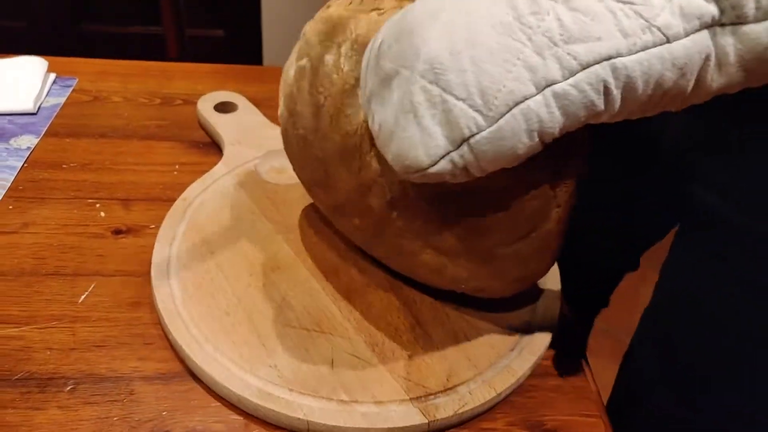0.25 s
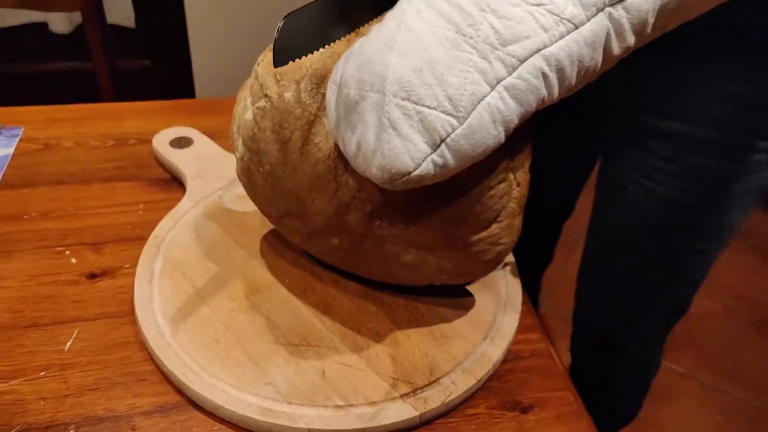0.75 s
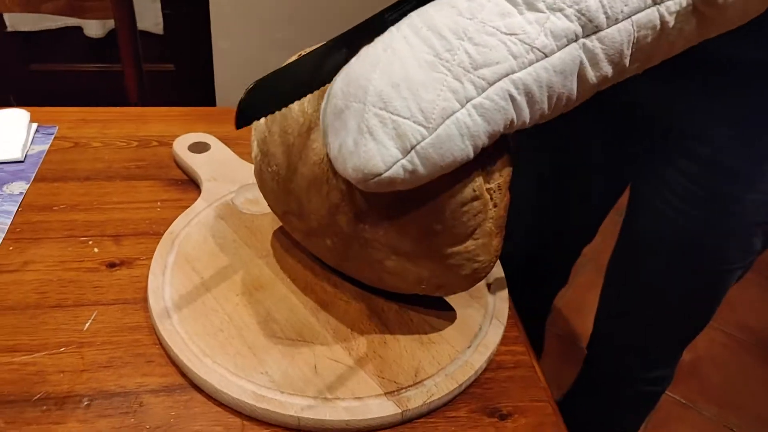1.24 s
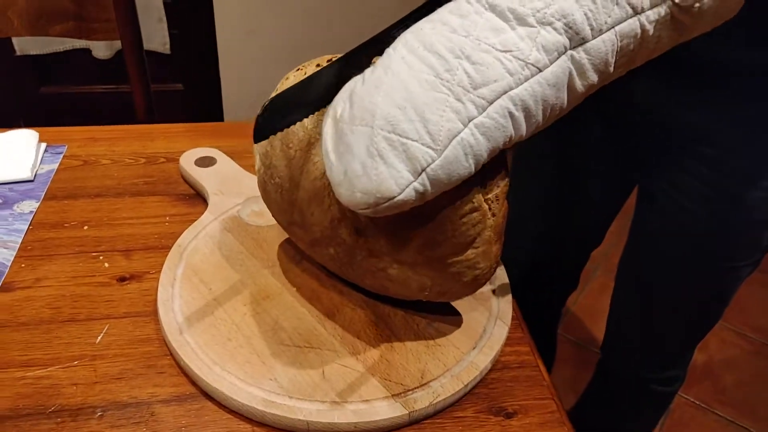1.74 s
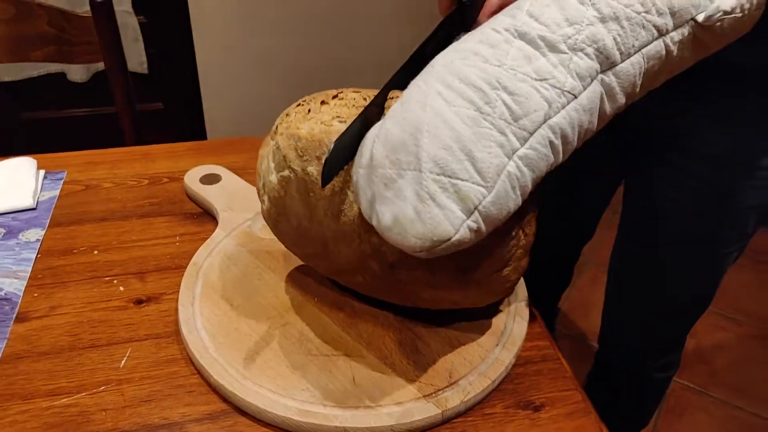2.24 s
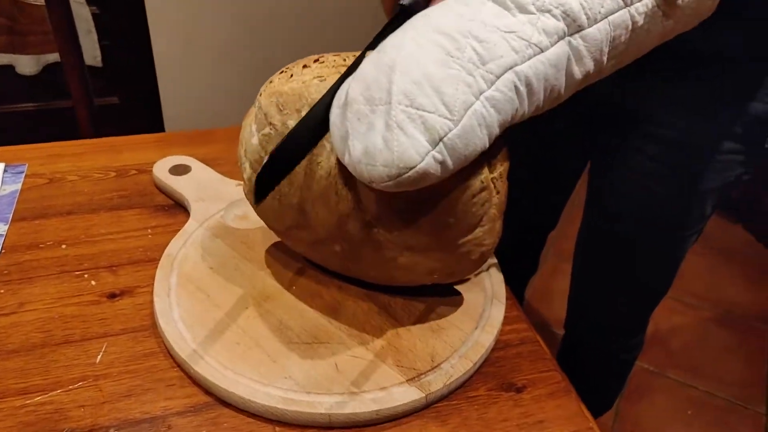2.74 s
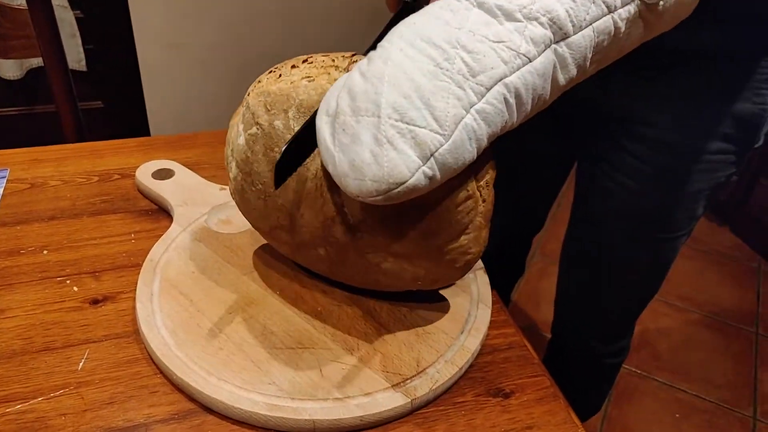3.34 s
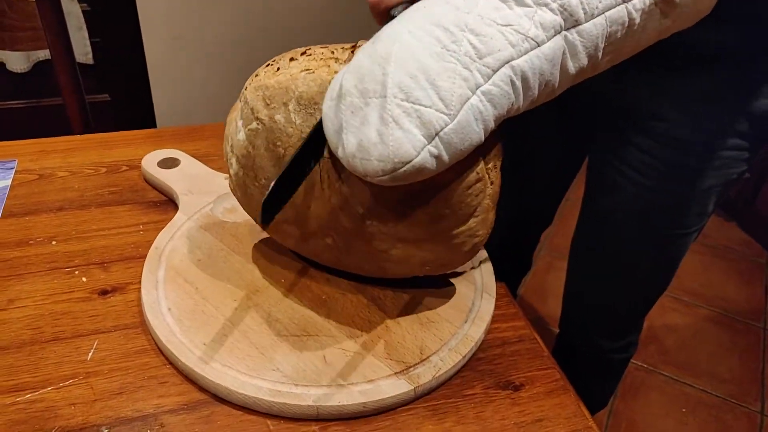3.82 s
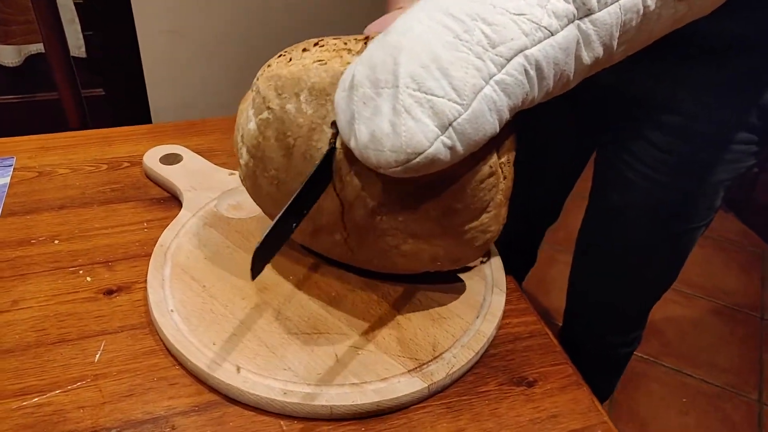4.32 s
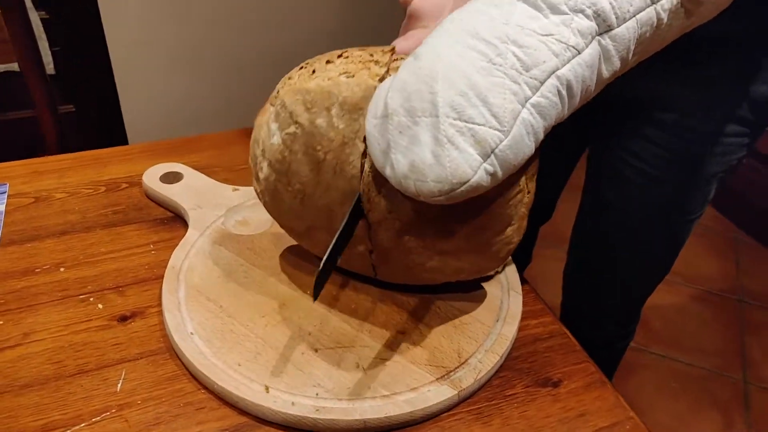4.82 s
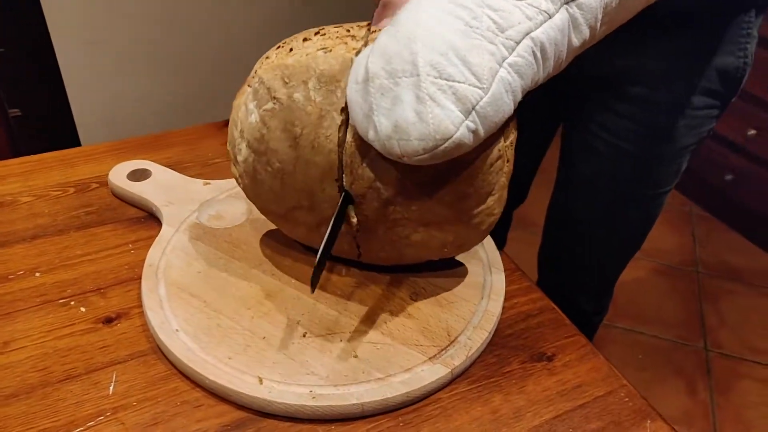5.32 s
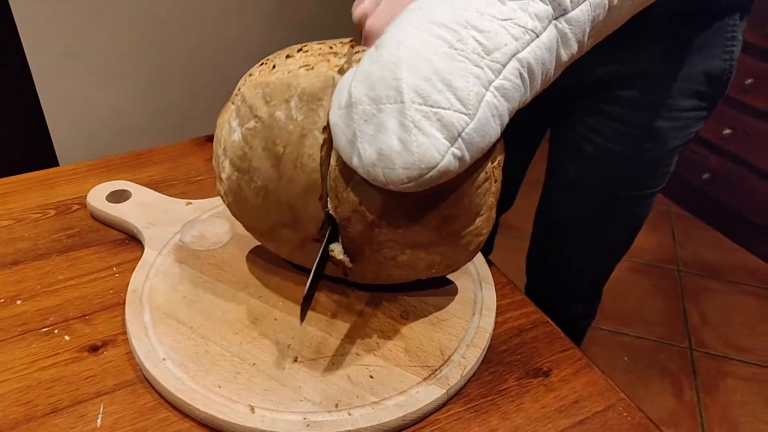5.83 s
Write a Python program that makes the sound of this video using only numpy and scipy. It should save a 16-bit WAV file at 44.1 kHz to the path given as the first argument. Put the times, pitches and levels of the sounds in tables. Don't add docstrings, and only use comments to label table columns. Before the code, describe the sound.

In a small, quiet kitchen with a faint low hum, a phone picks up the scene closely in stereo. From 0 to 0.7 seconds a loaf is handled and set on a wooden board: a faint touch, then low soft thuds around 0.2, 0.35 and 0.6. At about 0.8 a serrated knife starts sawing lightly, and by 1.2 it bites with a crunchy rasp. Strokes alternate roughly every 0.2 seconds, teeth catching in a rapid rough stutter, with brief gaps at the turns. Strong strokes at 1.6 and 2.3 thump the board; 2.5 to 3.3 is somewhat lighter. From 3.5 to 5.3 the cutting is fullest, with hollow crust knocks, dense crackle and hard bright snaps, the heaviest jolt near 5.15. A softer stroke follows at 5.35, another strong crunch with a big crack around 5.6 to 5.7, then a lighter stroke and final bump near 6.06.

```python
import sys
import numpy as np
from scipy import signal
from scipy.fft import rfft, irfft, next_fast_len
from scipy.io import wavfile
from scipy.ndimage import uniform_filter1d

SR = 44100
rng = np.random.default_rng(int(sys.argv[2]) if len(sys.argv) > 2 else 0)


def boost(x):
    u = np.asarray(x, float) / 20
    return 10 ** u


def unload_wav(signal):
    wavfile.write(
        sys.argv[1],
        SR,
        np.round(np.clip(np.atleast_2d(signal).T, -1, 1) * 32767).astype(np.int16),
    )


N = 267687


def evened(x):
    return x / np.sqrt(np.mean(x ** 2) + 1e-20)


def unit(h):
    return h / np.linalg.norm(h, axis=-1, keepdims=True)


def read(points, hz):
    f, value = np.transpose(points)
    return np.interp(np.log(hz + 1), np.log(f + 1), value)


def along(curve):
    return np.interp(np.arange(N) / SR, *np.transpose(curve))


def causal(points, size=4096):
    level_db = np.maximum(read(points, abs(np.fft.fftfreq(size, 1 / SR))), -80)
    spectrum = np.exp(np.conj(signal.hilbert(np.log(boost(level_db)))))
    return unit(np.fft.ifft(spectrum).real[:size // 2])


def ringing(modes):
    t = np.arange(SR // 2) / SR
    return unit(sum(boost(db - 60 * t / t60) * np.sin(2 * np.pi * hz * t) for hz, db, t60 in modes))


def resonate(x, hz, width):
    turn = np.exp(2j * np.pi * np.cumsum(hz) / SR)
    r = np.exp(-np.pi * width / SR)
    return 2 * (turn * signal.lfilter([1 - r], [1, -r], x / turn)).real


def slips(per_s, spread_db):
    chance, size, sign = rng.random((N, 3)).T
    strength = boost(spread_db * np.minimum(-np.log(size + 1e-9), 4))
    return (chance < per_s / SR) * strength * np.sign(sign - 0.5)


def blows(rows, column):
    rows, out = np.array(rows), np.zeros(N)
    out[np.minimum((rows[:, 0] * SR).astype(int), N - 1)] = boost(rows[:, column])
    return out


def clumps(depth_db, length_s):
    size = round(length_s * SR)
    wander = uniform_filter1d(uniform_filter1d(rng.standard_normal(N), size), size)
    return boost(depth_db * evened(wander))


def bursts(drive, burst_s, patchy_db, count=10):
    t, spot, out = np.arange(1024) / SR, rng.integers(0, count, N), np.zeros((2, N))
    hz = np.linspace(1500, 16000, num=9)
    for k in range(count):
        noise = rng.standard_normal((2, len(t))) + 0.5 * rng.standard_normal(len(t))
        burst = noise * np.exp(-t / burst_s)
        colour = causal(np.transpose([hz, patchy_db * rng.standard_normal(len(hz))]), size=512)
        burst = unit(signal.oaconvolve(burst, colour[None], axes=1))
        out += signal.oaconvolve((drive * (spot == k))[None], burst, axes=1)[:, :N]
    return out


def effort(rows, column, shape, bite):
    rows, t = np.array(rows), np.arange(0, N, 32) / SR
    rise, fall, level_db = shape
    swell, grip_s = bite
    start, hold = rows[:, :1], rows[:, 1:2]
    early, late = start - t, t - start - hold
    db = rows[:, column, None] + level_db
    db = db - swell * rise * np.maximum(early, 0) - fall * np.maximum(late, 0)
    db -= 2500 * np.maximum(early - grip_s, 0)
    return np.interp(np.arange(N) / SR, t, np.sqrt((boost(db) ** 2).sum(0)))


# (f/Hz, level/dB)
HUM_COLOUR = [(24, -14), (45, 5), (110, 6), (320, 2.5), (444, -5.5), (2570, -19), (3560, -21.5),
              (4130, -20.5), (6820, -21.5), (8500, -31), (12000, -32), (15500, -31)]


def hum():
    hz = np.fft.rfftfreq(N, 1 / SR)
    left, other = rfft(rng.standard_normal((2, N)))
    same = 0.9 / (1 + (hz / 500) ** 2)
    right = same * left + np.sqrt(1 - same ** 2) * other
    return boost(-45.5) * evened(irfft(np.array([left, right]) * boost(read(HUM_COLOUR, hz)), N))


# (rise/dB per s, fall/dB per s, level/dB)
PUSH_SHAPE, KNOCK_SHAPE = (446, 250, 2.04), (520, 326, 2.1)
CRACKLE_SHAPE, SHAKE_SHAPE = (500, 187, 4.22), (230, 140, -3)
# (start t/s, hold t/s, push level/dB, knock level/dB, crackle level/dB)
SETTLING = [
    (0.048, 0.013, -45, -46, -65),
    (0.21, 0.064, -31, -54, -56.5),
    (0.354, 0.0066, -33.5, -61, -68),
    (0.39, 0.029, -29, -46, -59),
    (0.619, 0.01, -36.5, -52, -55),
    (0.68, 0.15, -56, -51.5, -53.5),
]
# (start t/s, hold t/s, push level/dB, knock level/dB, crackle level/dB)
AWAY = [(0.795, 0.062, -32, -47, -53.5), (1.1, 0.037, -25, -36, -41.5), (1.382, 0.074, -25.5, -38.5, -43.5),
        (1.731, 0.056, -24, -34.5, -44), (2.095, 0.039, -21.5, -26, -36), (2.537, 0.055, -30, -28.5, -41),
        (2.928, 0.048, -27, -27, -38), (3.318, 0.033, -26.5, -28, -38.5), (3.72, 0.035, -24, -27.5, -42.5),
        (4.081, 0.024, -21.5, -22.5, -39), (4.445, 0.087, -20.5, -30.5, -42),
        (4.884, 0.066, -21, -26.5, -39.5), (5.352, 0.1, -27.5, -41, -47.5), (5.839, 0.1, -26.5, -36, -45.5)]
# (start t/s, hold t/s, push level/dB, knock level/dB, crackle level/dB)
BACK = [(0.931, 0.049, -30, -52, -46.5), (1.21, 0.07, -20.5, -30, -38), (1.562, 0.052, -15.5, -25, -37.5),
        (1.906, 0.034, -23.5, -35.5, -42.5), (2.324, 0.076, -17.5, -24, -37.5),
        (2.743, 0.057, -25.5, -28.5, -40.5), (3.09, 0.088, -25, -30.5, -44),
        (3.499, 0.043, -16, -21.5, -39), (3.896, 0.049, -17, -22, -38), (4.283, 0.073, -19, -24, -33),
        (4.665, 0.097, -17.5, -24.5, -33), (5.117, 0.1, -17.5, -27, -36.5), (5.598, 0.13, -21.5, -30, -35),
        (6.071, 0.0041, -27, -36, -52)]
# (start t/s, hold t/s, push level/dB, knock level/dB, crackle level/dB)
RESTING = [
    (0.9, 5.2, -41, -46.5, -60.5),
    (2.274, 0.034, -52, -56, -45.5),
    (0.03, 0.19, -60, -64, -61),
    (0.64, 0.28, -55, -58, -65),
    (3.48, 0.02, -27, -32, -45),
    (4.64, 0.018, -25, -36, -48),
    (5.08, 0.016, -30, -40, -48),
]


def strokes(column, shape):
    settling = effort(SETTLING, column, shape, bite=(1.1, 0.017))
    away = effort(AWAY, column, shape, bite=(0.81, 0.027))
    back = effort(BACK + RESTING, column, shape, bite=(1, 0.05))
    return np.sqrt(settling ** 2 + away ** 2 + back ** 2)


# (t/s, pace/per s)
PACE = [(0.22, 93), (0.36, 176), (0.97, 169), (1.24, 148), (1.6, 188), (2.12, 83.4), (2.37, 100),
        (2.58, 168), (2.79, 163), (2.96, 129), (3.14, 152.5), (3.75, 149), (3.93, 134), (4.1, 164),
        (4.33, 155), (4.52, 94.5), (4.72, 153), (5.67, 166)]


def tooth_train(wander=0.1, spread_db=4.5):
    drift = evened(uniform_filter1d(rng.standard_normal(N), 500))
    pace = along(PACE) * (1 + wander * drift)
    caught = np.diff(np.floor(np.cumsum(pace) / SR), prepend=0)
    return caught * boost(spread_db * rng.standard_normal(N))


# (t/s, peak level/dB)
THUDS = [(0.203, -18.5), (0.346, -13), (0.613, -14), (0.93, -16), (0.962, -10), (1.102, -19), (1.209, -14),
         (1.296, -17), (1.577, -2.5), (1.931, -3), (2.08, -17), (2.321, -26), (2.947, -8.5), (3.091, -16),
         (3.323, -10.5), (3.495, -29), (3.519, -13), (3.732, -19), (3.882, -18), (3.934, -6), (4.482, -24),
         (4.67, -2), (4.896, -5.5), (4.925, -7.5), (5.078, -9), (5.156, 3.5), (5.58, -7.5), (5.637, -20),
         (5.831, -10.5), (6.06, -4.5)]
# (t/s, peak level/dB)
MORE_THUDS = [(1.14, -14), (1.229, -1.5), (1.25, -9), (1.269, -14), (1.591, 2), (1.604, -3), (1.618, -10),
              (1.913, -8), (2.115, -20), (2.35, -4), (2.38, -5), (2.407, -7), (2.741, -20), (2.789, -20),
              (3.12, -20), (3.172, -11), (3.539, -2), (3.565, -1), (3.708, -17), (3.856, -10.5), (3.905, -21),
              (3.958, -9), (4.038, -12), (4.079, -4), (4.244, -10), (4.308, -5), (4.339, -7), (4.436, -25),
              (4.519, -6), (4.635, -2.5), (4.699, -8), (4.728, -18), (4.769, -23), (4.866, -10), (4.939, -10),
              (5.123, -2), (5.18, -11), (5.21, -11), (5.238, -15), (5.451, -10.5), (5.659, -10), (5.678, -6),
              (5.719, -27), (5.936, -9), (5.949, -12)]
# (t/s, peak level/dB)
KNOCKS = [(1.109, -11.5), (1.141, -14), (1.205, -12), (1.526, -17), (1.546, -17), (1.559, -17),
          (1.936, -7.5), (2.092, -19), (2.305, -33), (2.322, -16), (2.347, -9), (2.394, -14.5),
          (2.565, -16), (2.727, -25), (2.911, -18), (2.933, -21), (2.952, -9), (3.11, -17), (3.135, -10),
          (3.311, -12), (3.468, -23), (3.49, -13), (3.501, -4), (3.514, -10), (3.541, -7), (3.567, -11),
          (3.709, -33), (3.727, -28), (3.884, -13), (3.885, -10.5), (3.894, -9.5), (3.905, -6),
          (3.913, -4.5), (3.94, -14), (4.024, -22), (4.042, -10), (4.066, -15), (4.087, -8.5), (4.245, -21),
          (4.294, -24), (4.323, -12), (4.441, -16), (4.639, -25), (4.689, -6), (4.71, -6.5), (4.734, -9),
          (4.753, -8), (4.893, -16), (4.92, -19), (4.926, -7), (5.081, -31), (5.108, -18), (5.166, -22),
          (5.211, -16), (5.587, -31), (5.612, -21), (5.646, -18), (5.646, -6), (5.681, -19), (5.692, -13)]
# (start t/s, hold t/s, shake level/dB)
LURCHES = [
    (1.92, 0.017, -19),
    (2.335, 0.034, -15.5),
    (2.78, .02, -25),
    (3.5, 0.058, -30),
    (3.74, 0.021, -16.5),
    (4.5, 0.019, -15),
    (4.68, 0.017, -39),
    (5.18, 0.031, -12),
    (5.58, 0.082, -16),
]
# (f/Hz, level/dB)
THUMP = [(53, -57.5), (90, -5.5), (200, -1.5), (283, 0), (412, -0.5), (572, -10), (900, -26), (1170, -26.5),
         (1980, -120)]
# (f/Hz, level/dB, time to fall 60 dB t/s)
BOARD = [(194, -3.5, 0.13), (229, 7, 0.25), (270.2, 0.5, 0.37), (289, -5, 0.24), (319.5, -1.5, 0.25),
         (363, 4, 0.19), (411.3, -3, 0.17), (463, -6.5, 0.078), (538, -10.5, 0.16), (609, -6, 0.082)]
# (f/Hz, level/dB, time to fall 60 dB t/s)
TABLE = [(101.8, 0.92, 0.12), (113, 9.4, 0.23), (139.4, 2, 0.47), (157.3, 1, 0.48)]


def board(teeth):
    body = boost(-6) * ringing(BOARD)
    body[:2048] -= causal(THUMP)
    body = unit(body)

    pushes = evened(evened(teeth) + 1.07 * evened(slips(400, 2.5)))
    hard = blows(THUDS, 1) + boost(-3.5) * blows(MORE_THUDS, 1)
    hard = np.roll(hard, round(0.00284 * SR))
    thuds = (hard + boost(-9) * blows(KNOCKS, 1)) / abs(body).max()
    pressing = boost(-4) * strokes(column=2, shape=PUSH_SHAPE) * pushes
    wood = signal.oaconvolve(pressing - boost(-4.5) * thuds, body)

    lurch = effort(LURCHES, column=2, shape=PUSH_SHAPE, bite=(0.98, 0.026))
    shake = boost(-12) * (strokes(column=2, shape=SHAKE_SHAPE) + lurch) * pushes
    top = signal.oaconvolve(shake - boost(-12) * thuds, ringing(TABLE))
    throb = resonate(resonate(shake, along(PACE), 28), along(PACE), 27)

    freedom = along([(0, 0.85), (0.7, 0.91), (0.9, 0.3), (7, 0.3)])
    ring = boost(-24) * signal.oaconvolve(thuds * freedom, ringing(BOARD))
    return wood[:N] + ring[:N] + top[:N] + boost(24) * throb


# (t/s, peak level/dB, knock below 2 kHz level/dB, sizzle above 8 kHz level/dB)
CRACKS = [(0.3499, -21, -23, -39), (0.9277, -23, -23, -37), (0.9619, -22, -54, -24.5),
          (1.1086, -18, -11.5, -26), (1.2012, -12.5, -39, -32), (1.5708, -14.5, -21, -45),
          (1.8968, -17.5, -23, -46), (2.395, -12, -13.5, -42), (2.9091, -32, -23, -45),
          (3.1344, -10, -19, -28), (3.1652, -11, -37, -31), (3.3115, -38, -23, -35), (3.469, -17, -25, -44),
          (3.4902, -5.5, -19, -44), (3.5134, -6.5, -23, -41), (3.895, -10.5, -30, -39),
          (3.927, -7, -28, -45), (4.0422, -16, -36, -37), (4.0831, -11, -34, -39),
          (4.0878, -12.5, -19, -28), (4.2951, -16, -28, -40), (4.4427, -13.5, -17, -49),
          (4.6812, -29, -28.5, -23), (4.7245, -6, -13, -37), (4.752, -5, -39, -20.5),
          (5.1096, -26, -32, -47), (5.1634, -8.5, -24, -26), (5.2031, -4, -22, -16),
          (5.5871, -16, -26, -47), (5.6939, -1.5, -8, -33)]
# (t/s, peak level/dB, knock below 2 kHz level/dB)
TICKS = [(0.351, -30, -21.5), (3.3085, -26, -24), (4.892, -26, -22), (5.878, -20, -22), (5.94, -29, -24),
         (5.97, -36, -26), (4.48, -19, -31), (4.51, -27, -29), (6.061, -16, -26), (0.906, -34, -38),
         (0.047, -45, -33), (0.8, -31, -45), (2.0686, -39, -44), (2.265, -24, -38), (2.5203, -25, -36),
         (2.8964, -26, -41), (3.3052, -32, -43), (2.727, -42, -32), (0.387, -28, -33), (1.0819, -24, -28),
         (1.141, -14.5, -33), (1.3563, -32, -42), (2.2887, -21, -40), (2.3306, -17, -32), (3.5, -23, -30),
         (4.6039, -25, -35), (4.759, -16, -30), (5.211, -16, -19), (5.566, -29, -29), (5.701, -9, -21),
         (1.3763, -22, -24), (1.5254, -19, -29), (1.5578, -24, -30), (1.729, -18, -26), (2.0852, -25, -24),
         (2.5287, -20, -24), (2.5666, -14.5, -31), (2.7092, -25.5, -29), (2.9497, -12, -23),
         (3.3263, -15, -40), (3.4481, -22, -26), (3.715, -23, -42), (3.8873, -26, -33), (4.2603, -36, -19),
         (4.6379, -35, -18), (4.8703, -18, -36), (5.0818, -29, -24), (5.247, -14, -16), (5.344, -20, -20),
         (5.5163, -18, -44), (5.8331, -15.5, -20)]
# (f/Hz, width f/Hz, level/dB)
CRUST = [(829, 180, 2), (1013, 540, 4.5), (1238, 270, 4.5), (1737, 470, -4.5), (2560, 1400, -6)]
# (t/s, f/Hz)
CAVITY = [(0.97, 620), (1.6, 625), (1.94, 1417), (2.12, 631.3), (2.37, 1480), (2.79, 620.5), (2.96, 1430),
          (3.14, 800), (3.33, 1160), (3.65, 980), (3.93, 1080), (4.1, 1013), (4.33, 1380), (4.52, 636.7),
          (5.17, 644.2), (5.67, 845.8)]


def crust(teeth, count=12):
    t, spot, out = np.arange(1500) / SR, rng.integers(0, count, N), np.zeros((2, N))
    grip = evened(0.28 * evened(teeth) + evened(slips(700, 4.4)))
    drive = boost(-6) * strokes(column=3, shape=KNOCK_SHAPE) * grip
    drive += boost(10) * (blows(CRACKS, 2) + blows(TICKS, 2) + boost(-2) * blows(KNOCKS, 1))
    edges = signal.butter(2, [520, 3000], "bandpass", fs=SR, output="sos")
    for k in range(count):
        shift = rng.uniform(0.93, 1.104, len(CRUST))
        phase = rng.normal(0, 0.69, (len(CRUST), 2, 1))
        knock = np.zeros((2, len(t)))
        for (hz, width, db), s, p in zip(CRUST, shift, phase):
            dying = boost(db) * np.sqrt(width) * np.exp(-np.pi * width * t)
            knock += dying * np.sin(2 * np.pi * hz * s * t + p)
        knock = unit(signal.sosfilt(edges, knock))
        out += signal.oaconvolve((drive * (spot == k))[None], knock, axes=1)[:, :N]
    out += boost(7.5) * signal.sosfilt(edges, blows(KNOCKS, 1) + blows(CRACKS, 2))
    return out + boost(-6.5) * resonate(out, along(CAVITY), 220)


# (f/Hz, level/dB)
SNAP = [(1060, -35), (1800, -3.5), (2120, -4.5), (2390, -4.5), (3360, -8), (4120, -8.5), (5330, -5.5),
        (6060, -11), (6640, -6.5), (8130, -18), (11100, -22.5), (13100, -20), (15100, -11), (16200, -19)]


def crackle(teeth):
    bunch = signal.lfilter([1], [1, -np.exp(-1 / (0.027 * SR))], abs(teeth))
    sawing = strokes(column=4, shape=CRACKLE_SHAPE)
    tearing = (0.8 + 0.22 * evened(bunch)) * clumps(2.04, 0.0095)
    fine = boost(-2) * sawing * evened(slips(1800, 1.93) * tearing)

    low = signal.butter(3, 7800, "low", fs=SR, output="sos")
    high = signal.butter(3, 7800, "high", fs=SR, output="sos")
    breaks = blows(CRACKS, 1) + blows(TICKS, 1)
    sizzle = blows(CRACKS, 3) + boost(-18.5) * blows(TICKS, 1)
    snaps = signal.sosfilt(low, bursts(boost(4.5) * breaks, 0.0009, 3))
    snaps += signal.sosfilt(high, bursts(boost(25) * sizzle, 0.0013, 3))
    snaps += bursts(boost(2) * breaks, 0.015, 3)
    snaps += bursts(boost(-9.5) * sawing * evened(slips(220, 2.8)), 0.00075, 5.8)
    snaps += bursts(boost(-22.5) * np.sqrt(sawing) * slips(45, 2.8), 0.00064, 4)
    return signal.oaconvolve(bursts(fine, 0.0019, 3.06) + snaps, causal(SNAP)[None], axes=1)[:, :N]


# (f/Hz, time to fall 60 dB t/s)
ROOM = [(100, 0.091), (400, 0.63), (1500, 0.25), (5000, 0.28), (14000, 0.31)]


def room(x, same_hz=480, count=4, turn_s=0.3738):
    hz, t, z = signal.stft(rng.standard_normal((count, 2, SR // 2)), SR, nperseg=256)
    same = 1 / (1 + (hz[:, None] / same_hz) ** 4)
    z[:, 1] = same * z[:, 0] + np.sqrt(1 - same ** 2) * z[:, 1]
    fading = boost(-60 * t / read(ROOM, hz)[:, None])
    tails = signal.istft(z * fading, SR, nperseg=256)[1]
    tails *= np.clip(np.arange(tails.shape[-1]) / SR / 0.005, 0, 1)
    turn = np.arange(N) / SR / turn_s - np.arange(count)[:, None]
    away = (turn + count / 2) % count - count / 2
    share = np.cos(np.pi / 2 * np.clip(away, -1, 1))
    return signal.fftconvolve((share * x)[:, None], unit(tails), axes=2).sum(0)[:, :N]


def scene():
    teeth = tooth_train()
    low = board(teeth)
    high = crust(teeth) + crackle(teeth)
    mix = low + high + room(boost(-8.5) * low + boost(-2) * high.mean(0))
    late_right = np.pad(mix[1], (3, 0))[:N]
    return np.array([mix[0], late_right]) + hum()


# (f/Hz, share of bands lost)
EMPTIED = [(2600, .02), (3400, .07), (4700, .03), (6000, .08), (7800, .38), (11000, .34), (13500, .16),
           (15000, .03)]


def thinned(x, size=5, count=4):
    hz, t, z = signal.stft(x, SR, nperseg=1024, noverlap=768)
    luck = rng.standard_normal((len(hz) // size + 1, len(t) // count + 1))
    luck = evened(uniform_filter1d(luck, size=2, axis=1))
    rank = 0.5 + 0.5 * np.tanh(0.85 * luck)
    rank = np.repeat(np.repeat(rank, size, axis=0), count, axis=1)[:len(hz), :len(t)]
    lost = (rank < read(EMPTIED, hz)[:, None]) & (hz[:, None] > 2500)
    treble = (abs(z[:, hz > 2500]) ** 2).sum((0, 1))
    lost &= treble < 1.8 * np.roll(treble, 2)
    kept = np.where(lost, boost(-24), 1)
    return signal.istft(z * kept, SR, nperseg=1024, noverlap=768)[1][:, :N]


def low_pass(x):
    return signal.sosfilt(signal.butter(12, 16980, fs=SR, output="sos"), x)


# (f/Hz, left over right level/dB)
LEAN = [(60, 2), (180, 2), (550, 1.5), (1650, 2.5), (4970, -1.5), (15000, -3.5)]


def record(dry):
    size = next_fast_len(N + SR // 4)
    hz = np.fft.rfftfreq(size, 1 / SR)
    lean = read(LEAN, hz)
    bass_cut = (1j * hz / (1j * hz + 51.4)) ** 4
    x = irfft(rfft(dry, size) * boost([lean / 2, -lean / 2]) * bass_cut, size)[:, :N]
    x = thinned(1.101 * np.tanh(x / 0.87))
    top_cut = signal.firwin(401, 15950, window=("kaiser", 8), fs=SR)
    mix = signal.oaconvolve(x, top_cut[None], "same")
    return low_pass(mix)


dry = scene()
out = record(dry)
unload_wav(out)
```